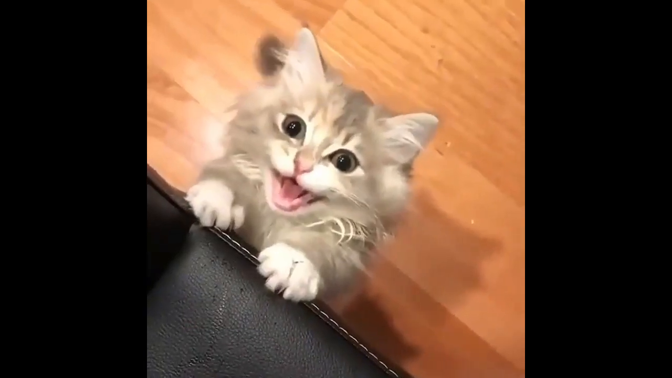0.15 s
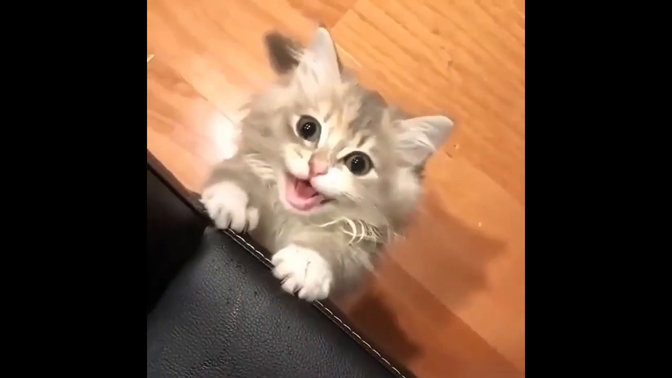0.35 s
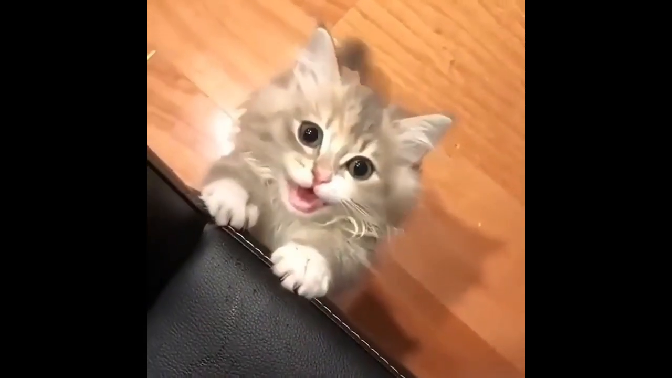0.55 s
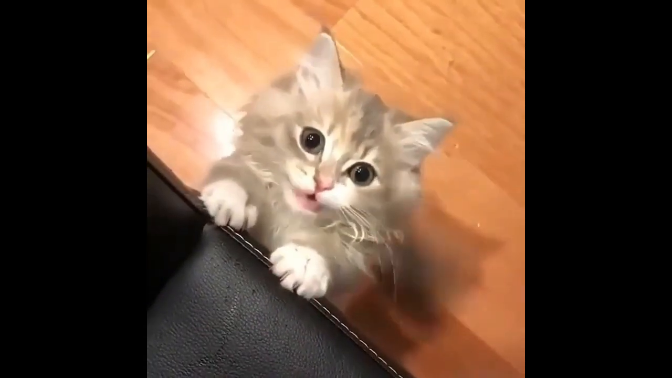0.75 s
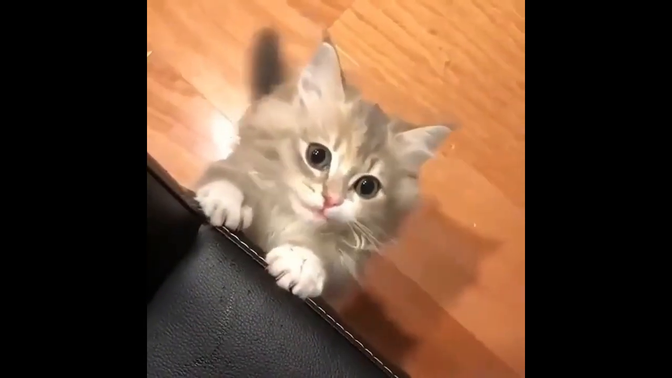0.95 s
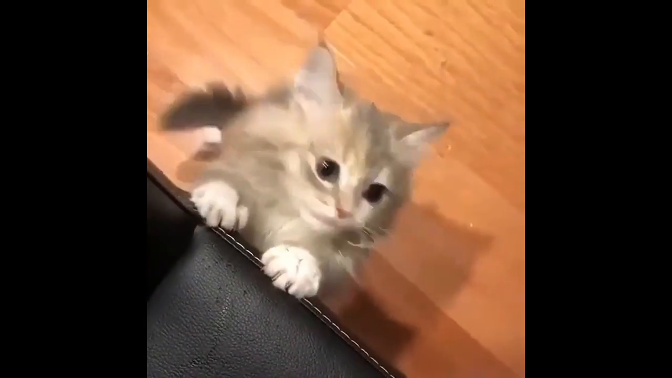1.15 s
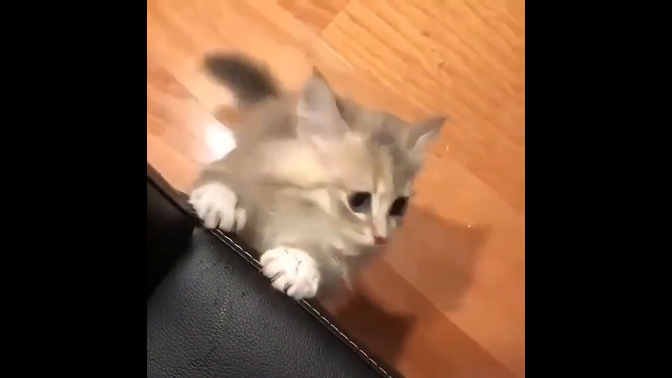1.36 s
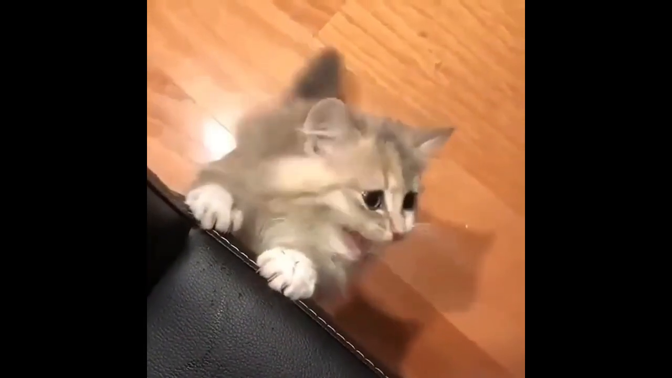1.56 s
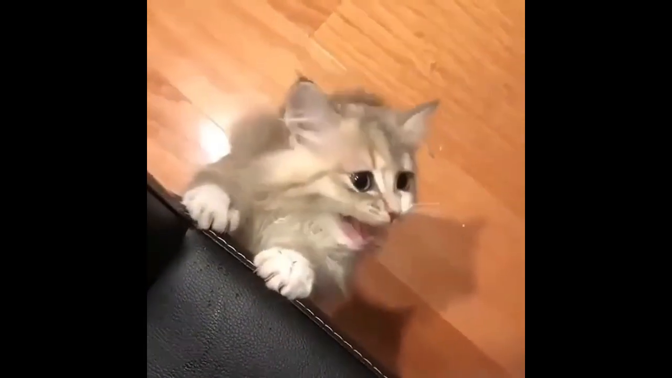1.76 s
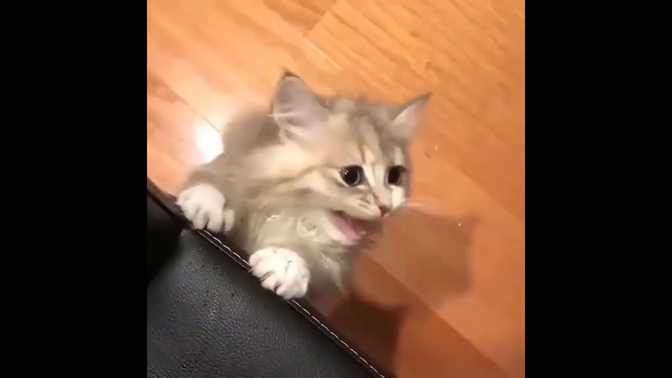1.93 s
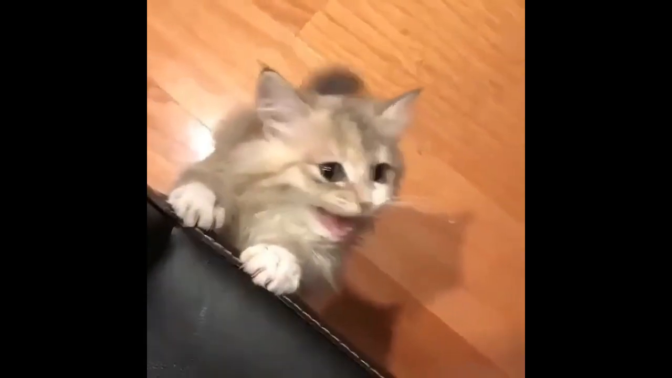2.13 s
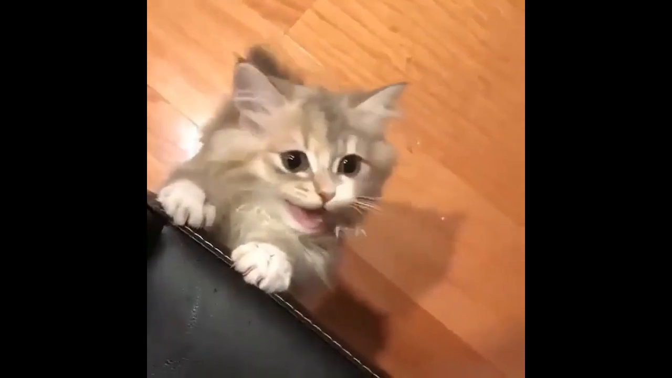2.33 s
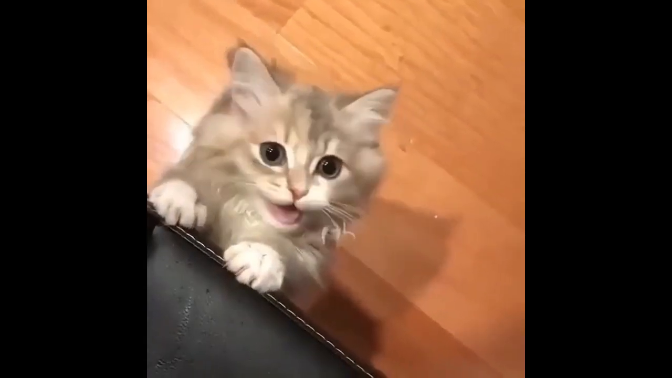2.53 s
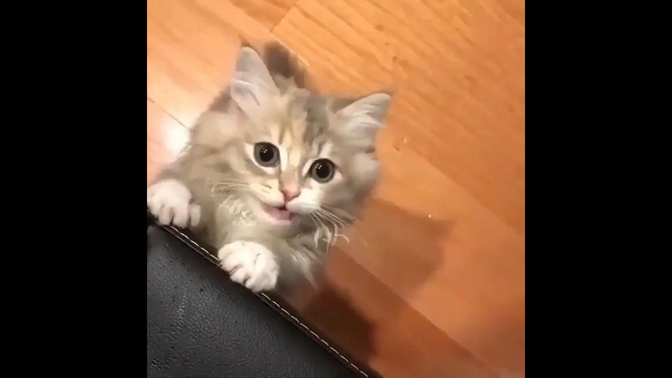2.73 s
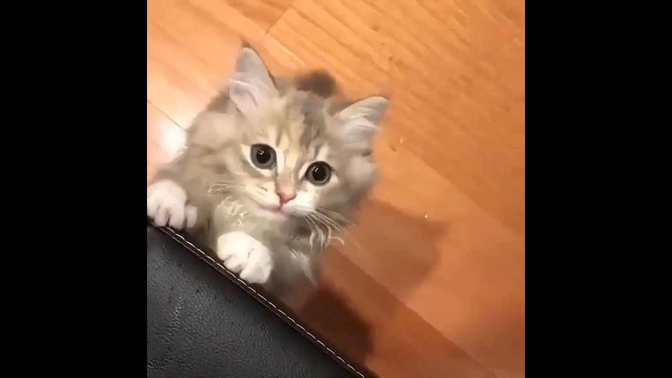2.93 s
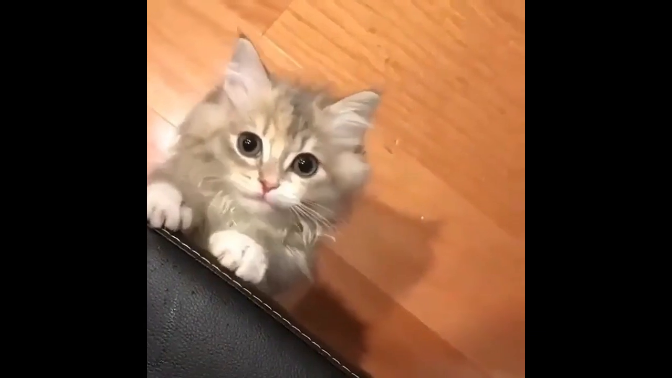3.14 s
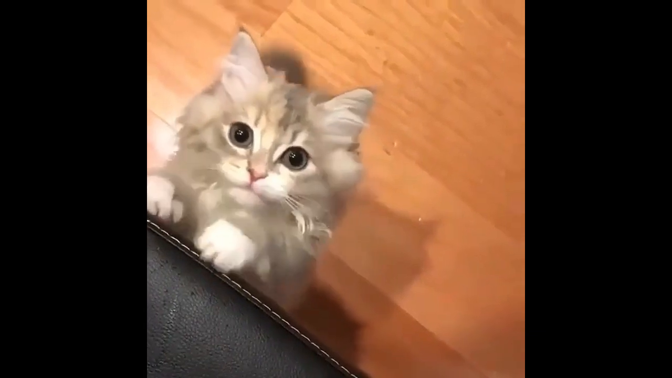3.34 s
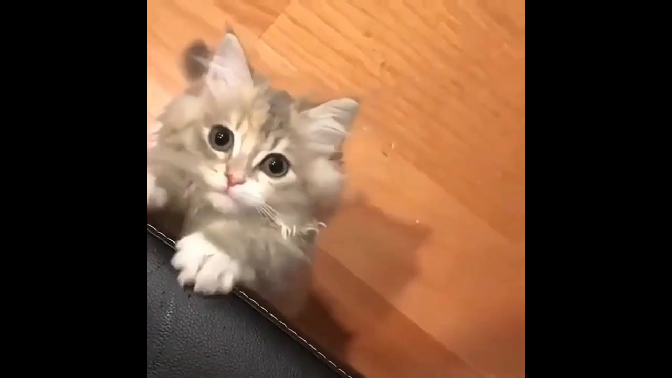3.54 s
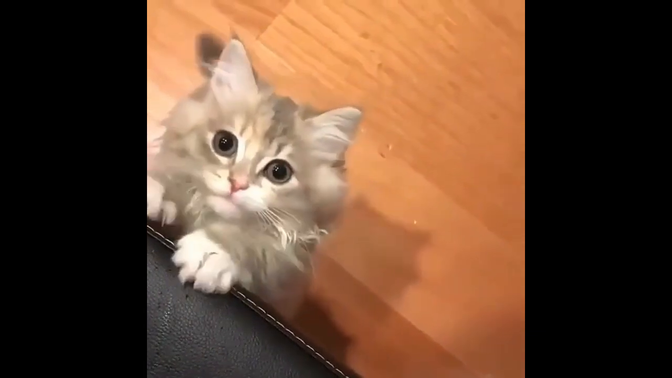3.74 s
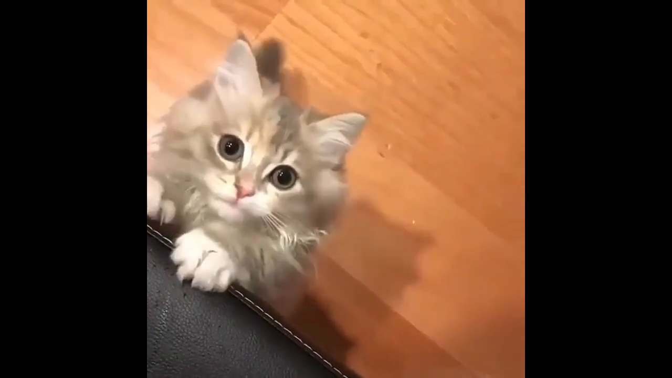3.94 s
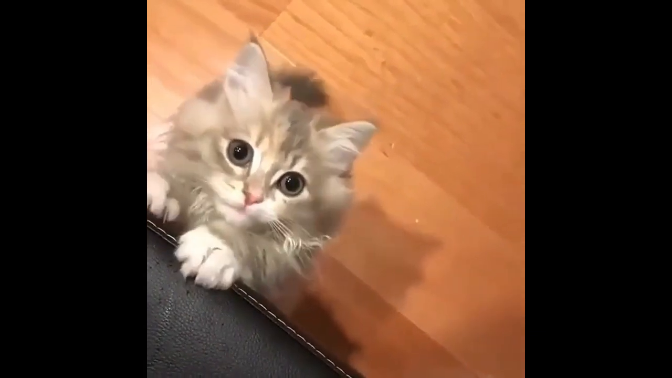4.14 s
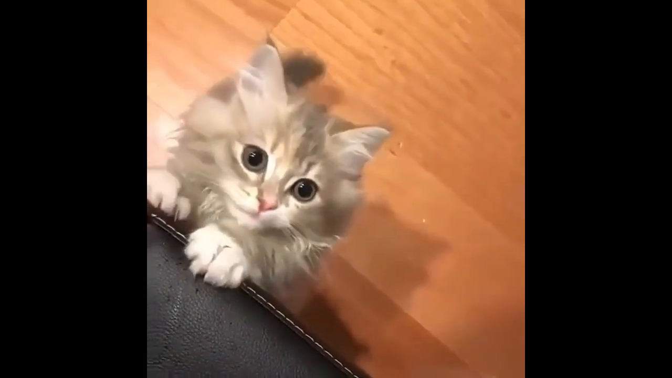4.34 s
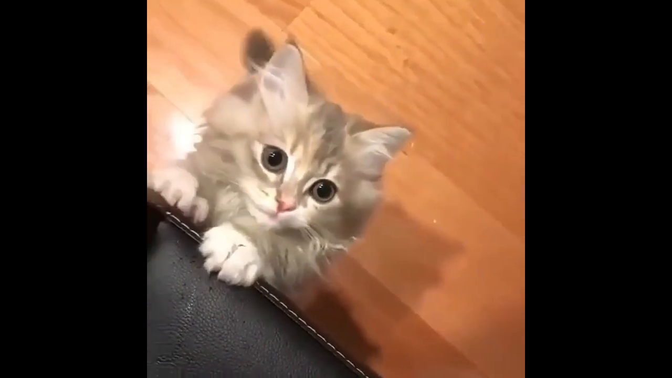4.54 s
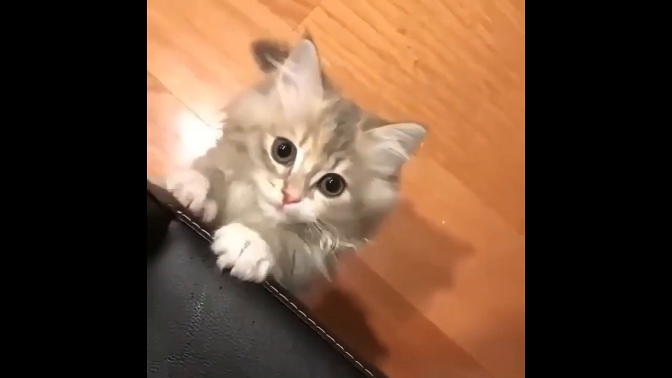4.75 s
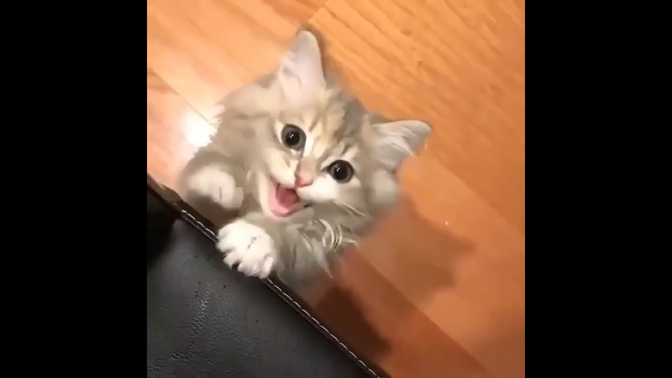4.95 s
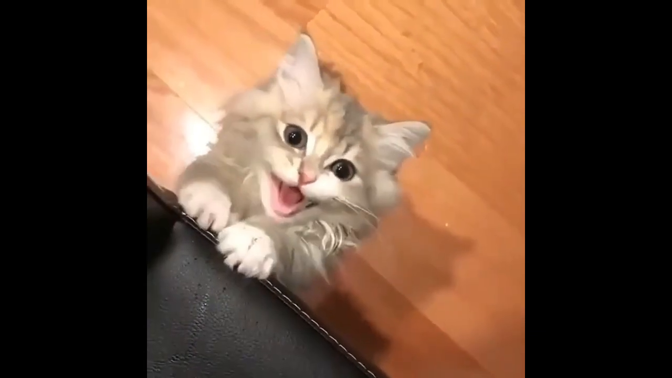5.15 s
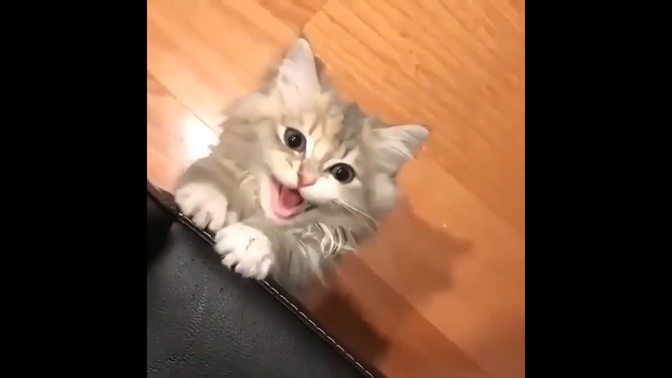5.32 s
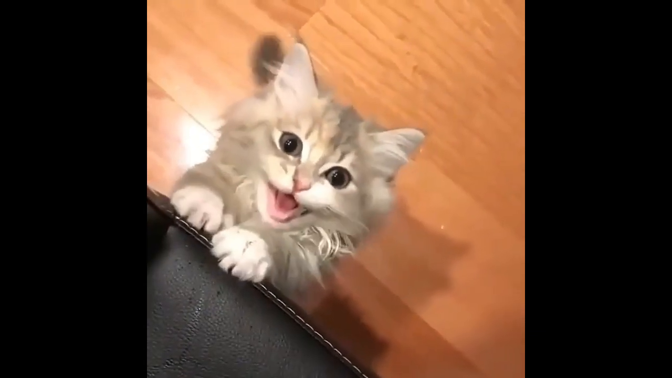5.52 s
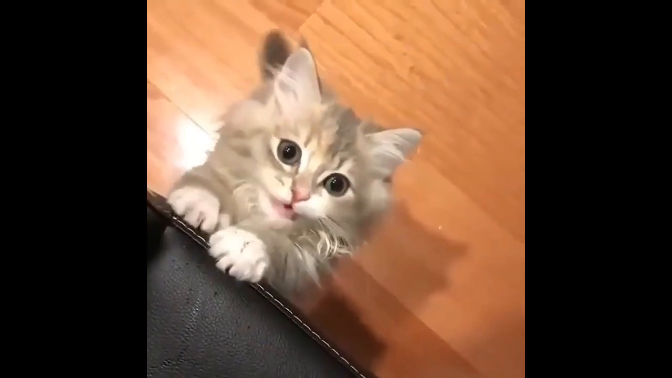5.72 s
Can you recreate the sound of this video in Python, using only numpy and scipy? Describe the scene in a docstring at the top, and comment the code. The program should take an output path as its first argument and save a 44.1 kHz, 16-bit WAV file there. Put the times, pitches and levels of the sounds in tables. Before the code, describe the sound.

A kitten meows twice in a small, quiet room, its high, slightly raspy voice close and nearly dry, dropping at the end of each call. Soft paw thumps, tiny claw ticks and faint rubbing on a leather seat follow. Then comes a third meow, bright at first and hoarse as it falls. A faint household appliance hums underneath.

```python
"""A kitten gives three long, high meows, close up, each sagging in pitch and ending in a creak.
Its vocal folds make a clear harmonic stack, shaped by throat and mouth; turbulent air adds rasp
at the edges of the calls and in hoarse stretches. It stands against a leather seat, where claws tick
and fur slides. Now and then come soft knocks: close, dry taps and roomier pats on the seat.
Underneath, a small room with dull air and a quiet appliance hum."""
import sys
import numpy as np
from scipy import signal
from scipy.fft import rfft, irfft
from scipy.io import wavfile
from scipy.ndimage import uniform_filter1d

SR = 44100
rng = np.random.default_rng(int(sys.argv[2]) if len(sys.argv) > 2 else 0)


def bounce(signal):
    """Save signal as a 16-bit WAV file at the path given by the first command-line argument."""
    frames = np.transpose(np.atleast_2d(signal))
    limited = np.clip(frames, -1, 1)
    pcm = np.round(limited * 32767).astype(np.int16)
    wavfile.write(sys.argv[1], SR, pcm)


N = 259308
TIME = np.arange(N) / SR

# the calls, the first already under way:
# start t/s, voice break t/s, end t/s, bite length/s, jaw closing/s, mouth resonance drop/Hz, creak/dB
CALLS = [(-.3, 0.775, 0.82, 0.047, 0.28, 150, 2.5), (1.509, 2.771, 2.806, 0.12, 0.58, 990, 0),
         (4.927, 5.769, 5.786, 0.19, 0.16, 1190, -3)]
# pitch curve of each call: t/s, f/Hz
PITCH_CURVES = [
    [(0.0, 808), (0.014, 800), (0.144, 781.4), (0.16, 791.2), (0.432, 760.7), (0.504, 742), (0.618, 675.6),
     (0.7, 699), (0.744, 688.6), (0.775, 657.4)],
    [(1.512, 697), (1.542, 786), (1.798, 764.2), (1.896, 783), (2.116, 793.6), (2.162, 776.4),
     (2.41, 770.7), (2.522, 743.3), (2.62, 680.5), (2.708, 670.3), (2.746, 642), (2.768, 602)],
    [(4.934, 730), (4.952, 794), (4.966, 816), (5.066, 734), (5.092, 726.5), (5.164, 754.5), (5.212, 756.7),
     (5.35, 789), (5.622, 773), (5.696, 740.5), (5.738, 675), (5.766, 605)],
]
# loudness curve of the mouth's ring in each call: t/s, level/dB
LOUDNESS_CURVES = [
    [(0.0, -34.5), (0.012, -35), (0.342, -41), (0.402, -38), (0.52, -41.5), (0.544, -35), (0.612, -48),
     (0.692, -37), (0.74, -39.5), (0.775, -51.5)],
    [(1.516, -51.5), (1.588, -49), (1.794, -36), (2.126, -39), (2.182, -47), (2.272, -43), (2.352, -48.5),
     (2.52, -45), (2.628, -61), (2.765, -57)],
    [(4.934, -36.5), (4.966, -42), (4.974, -40), (5.03, -37), (5.096, -45), (5.19, -32), (5.258, -30),
     (5.32, -34.5), (5.654, -39), (5.766, -50.5)],
]
# hoarse stretches: start t/s, end t/s, hiss against tone/dB, period doubling share
HOARSE_STRETCHES = [(1.62, 1.72, -19.5, .22), (1.72, 1.88, -31, .11), (2.2, 2.76, -29, 0),
                    (4.975, 5.03, -20, .24), (5.03, 5.3, -38, 0), (5.3, 5.76, -21, 0)]
# the kitten looks aside for the second call and turns back: t/s, turn (0-1)
HEAD_CURVE = [(1.0, .15), (1.5, 1), (2.05, 0.88), (2.65, 0.34), (4.9, 0.01)]
# the voice's five registers: first harmonic, last harmonic, hiss low f/Hz, hiss high f/Hz
VOICE_REGISTERS = [(1, 1, 500, 1100), (2, 2, 1100, 1800), (3, 4, 1800, 3300), (5, 7, 3300, 6000),
                   (8, 21, 6000, 14000)]
# each register's mix through a call:
# held level/dB, share of loudness swing, bite/dB, widening/dB, slack folds/dB, creak/dB, head turn/dB
REGISTER_MIX = [(-49.5, -0.0066, 1, -3, -1.5, -6, -3), (-55, -0.17, 5, -11, -6, 1.5, -1),
                (-38, 0.99, 0, 0, 0, -3.5, 0), (-45, 0.24, 11.5, 1, -7.5, 1.5, -2),
                (-50.5, 0.14, 5.5, -2, -7, 1.5, -7)]
# how readily each register turns to hiss: rasp offset/dB
REGISTER_AIR = [-8, 1, 1.5, -3, 12]
# how fast each register speaks: attack/s
REGISTER_ATTACK = [0.01, 0.021, 0.0029, 0.0068, 0.015]
# each register's slow tremor: level spread/dB
REGISTER_TREMOR = [.3, .9, .5, .7, 1.4]
# the throat's EQ on the harmonics: f/Hz, level/dB
THROAT_EQ = [(750, -8), (1550, -13.5), (2300, -13.5), (3100, 0), (3900, -2.5), (4650, -4.5), (5450, -22.5),
             (6200, -21), (7400, -24.5), (8600, -5.5), (9500, -5), (10600, -16.5), (12000, -25),
             (13400, -19)]
# colour of turbulent air in the throat: f/Hz, level/dB
BREATH_COLOUR = [(600, 19), (1900, -35), (2450, -25), (2900, 2), (3500, -11), (4500, 8), (5600, -9),
                 (7300, -17), (8700, 0), (10000, -0.5), (12000, -21), (13500, -11.5)]
# bright peak from the wide gape that opens a call: f/Hz, half width/Hz, level/dB, fade/s
GAPE_PEAK = (5800, 750, 18, 0.13)
# treble that stands out with the head turned: f/Hz, half width/Hz, level/dB
OFF_AXIS_PEAKS = [(4550, 300, 6), (5420, 270, 9.5), (6270, 90, 9.5), (6980, 250, 24), (14100, 340, 5)]
# soft knocks, from close, dry taps to roomier pats on the seat: t/s, level/dB, f/Hz, room send/dB
SOFT_KNOCKS = [(0.389, -45, 756, -10), (2.234, -53, 1300, -4), (2.275, -39, 736, -26),
               (2.961, -46, 353, 0.5), (3.383, -35.5, 371, -2), (3.659, -43.5, 250, -3),
               (3.738, -38.5, 340, -5), (4.771, -44.5, 530, -4.5), (5.014, -39, 770, -15)]
# modes of the padded seat: f/Hz, level/dB, t60/s
SEAT_MODES = [(103.5, -2.5, 0.073), (226, -12, 0.036), (375, -0.5, 0.019), (513, -3.5, 0.025),
              (684, 0, 0.016), (1184, 0, 0.0073)]
# claws catching the leather: t/s, level/dB
CLAW_CATCHES = [(2.966, -44), (3.3843, -32.5), (3.6454, -48), (3.7387, -43)]
# modes of a claw's snap: f/Hz, level/dB, t60/s
SNAP_MODES = [(1460, -5, 0.0037), (3500, -5, 0.002), (6040, -4.5, 0.0015), (12200, 1, 0.0021)]
# fur and paws sliding on the leather: centre t/s, half length/s, level/dB
SLIDES = [(0.766, 0.084, -56.5), (2.479, 0.058, -55), (2.82, 0.036, -56), (3.647, 0.026, -54),
          (4.873, 0.032, -55.5)]
# colour of that rubbing: f/Hz, level/dB
SLIDE_COLOUR = [(60, -4), (170, 6), (400, -1), (900, -9), (2000, -18), (12000, -37.5)]
# colour of the room's air: f/Hz, level/dB
AIR_COLOUR = [(15, -88), (25, -27), (58, -4), (107, 0.5), (132, -10), (168, -3), (237, -10), (352, -9.5),
              (459, -19), (497, -15.5), (758, -16.5), (988, -16), (2430, -26.5), (2770, -30.5),
              (13900, -44.5)]
# tones of a household appliance: f/Hz, level/dB
HUM_TONES = [(96.9, -75.5), (166.9, -62.5), (360.7, -69.5)]

BREAK_S = .004   # how fast the folds lose their rhythm


def meow(pitches, loudness, start, breaks, end, bite_s, closing_s, sink_hz, creak_db):
    """The vocal folds sound a harmonic stack in five registers; rasp trades its tone for hiss."""
    inside = (TIME >= start) & (TIME < end)
    t = TIME[inside]
    age_s = t - start
    creak = step((t - breaks) / BREAK_S)
    pitch, loud_db, turned = curve(pitches, t), curve(loudness, t), curve(HEAD_CURVE, t)
    levels_db = register_levels(loud_db, pitch, age_s, bite_s, creak, turned)
    jaw_closed = np.clip(1 + (t - breaks) / closing_s, 0, 1)
    mouth_hz = 2947 - sink_hz * jaw_closed
    rasp, doubling = roughness(t, age_s, creak)
    jitter = .038 * np.tanh(rasp)
    wobble = 1 + jitter * drift(220, len(t)) + .003 * drift(25, len(t))
    phase = 2 * np.pi * np.cumsum(pitch * wobble) / SR
    air = breath(phase, doubling)
    voice = 0
    registers = zip(VOICE_REGISTERS, levels_db, REGISTER_AIR, REGISTER_ATTACK, REGISTER_TREMOR)
    for (first, last, *band_hz), level_db, airy_db, attack_s, tremor_db in registers:
        harmonics = np.arange(first, last + 1)[:, None]
        tone = fold_tone(harmonics, phase, throat(harmonics * pitch, mouth_hz, turned, age_s))
        hiss = unit_rms(filtered(air, band_hz, "band", order=4))
        hiss_ratio = rasp * from_db(airy_db)
        envelope = from_db(level_db + tremor_db * drift(22, len(t))) * np.tanh(age_s / attack_s)
        voice += envelope * (tone + hiss_ratio * hiss) / np.hypot(1, hiss_ratio)
    voice *= 1 + doubling * np.sin(phase / 2)   # strong and weak cycles alternate
    voice *= 1 + .37 * np.tanh(80 * jitter) * drift(72, len(t))   # unsteady folds shake the level
    release = np.clip((end - t) / (end - breaks), 0, 1)
    out = np.zeros(N)
    out[inside] = voice * release * from_db(creak_db * creak)
    return out


def fold_tone(harmonics, phase, gains):
    """One register of the folds' tone; higher harmonics flutter more."""
    gains = gains / np.linalg.norm(gains, axis=0)
    flutter_db = .55 * np.sqrt(harmonics / 4) * np.array([drift(40, len(phase)) for _ in harmonics])
    # the throat delays each harmonic differently, spreading the pulse over its cycle
    partials = np.sin(harmonics * phase + rng.uniform(0, np.pi, harmonics.shape))
    return np.sqrt(2) * np.sum(gains * from_db(flutter_db) * partials, axis=0)


def throat(hz, mouth_hz, turned, age_s, mouth_db=17.5):
    """Gain of the vocal tract: each resonance lifts whichever harmonic it meets."""
    gape_hz, gape_width_hz, gape_db, gape_s = GAPE_PEAK
    mouth = mouth_db * bell(hz, mouth_hz, half_width_hz=480)
    gape = gape_db * np.exp(-age_s / gape_s) * bell(hz, gape_hz, gape_width_hz)
    off_axis = turned * sum(db * bell(hz, centre, width) for centre, width, db in OFF_AXIS_PEAKS)
    return from_db(eq_db(THROAT_EQ, hz) + mouth + gape + off_axis)


def register_levels(loud_db, pitch, age_s, bite_s, creak, turned, slack_hz=723):
    """Register levels in dB: a bright bite, the mouth widens, sagging folds go slack and dull, a creak."""
    swing_db = loud_db + 38   # against a held call
    bite = np.exp(-(age_s / bite_s) ** 2)
    widening = np.exp(-((age_s - bite_s - .077) / .15) ** 2)   # thins the low harmonics after the bite
    slack = step((slack_hz - pitch) / 7.4) * (1 - bite)
    return [held_db + share * swing_db + bite_db * bite + widen_db * widening
            + slack_db * slack + creak_db * creak + turned_db * turned
            for held_db, share, bite_db, widen_db, slack_db, creak_db, turned_db in REGISTER_MIX]


def roughness(t, age_s, creak, clear_db=-29, onset_db=-5, creak_db=5, settle_s=.018):
    """Rasp and period doubling: the folds run rough at the start, in hoarse stretches and letting go."""
    rasp = from_db(clear_db) + from_db(onset_db) * np.exp(-age_s / settle_s) + from_db(creak_db) * creak
    doubling = .25 * creak
    for start, end, hiss_db, share in HOARSE_STRETCHES:
        stretch = step((t - start) / BREAK_S) * step((end - t) / BREAK_S)
        rasp += from_db(hiss_db) * stretch
        doubling += share * stretch
    return rasp, doubling


def breath(phase, doubling):
    """Turbulence pulses as the folds open; it comes in patches, and in bursts when they lose rhythm."""
    patches = from_db((2.5 + 4 * doubling) * drift(60, len(phase)))
    patches /= np.sqrt(uniform_filter1d(patches ** 2, SR // 30))
    pulsing = 1 + .5 * np.cos(phase)
    return noise(BREATH_COLOUR, len(phase)) * pulsing * patches


def soft_knocks(lag_s=.002576):
    """Each knock rings at its own pitch over the seat's modes; returns dry sound and room send."""
    direct, send = np.zeros(N), np.zeros(N)
    click = signal.unit_impulse(SR // 4)
    for s, level_db, knock_hz, send_db in SOFT_KNOCKS:
        seat = sum(from_db(db + .5 + rng.normal(0, 1)) * ring(click, hz, t60)
                   for hz, db, t60 in SEAT_MODES)
        knock = from_db(-2.5) * ring(click, knock_hz, t60=.017)
        softened = filtered(seat + knock, 2.2 * knock_hz, "low")
        thump = from_db(level_db) * filtered(softened, 149, "high")
        at = int((s + lag_s) * SR)   # every thump sounds about 2.6 ms after its listed time
        direct[at:at + len(thump)] += thump
        send[at:at + len(thump)] += from_db(send_db) * thump
    return direct, send


def claws(trim_db=4.5, softest_cutoff_hz=4130):
    """A claw snaps off the leather with a tiny tick; the harder the snap, the brighter."""
    out = np.zeros(N)
    softest_db = min(db for _, db in CLAW_CATCHES)
    click = signal.unit_impulse(SR // 20)
    for s, level_db in CLAW_CATCHES:
        snap = sum((-1) ** i * from_db(db + rng.normal(0, 1)) * ring(click, hz, t60)
                   for i, (hz, db, t60) in enumerate(SNAP_MODES))
        cutoff_hz = softest_cutoff_hz * from_db(.5 * (level_db - softest_db))
        at = int(s * SR)
        out[at:at + len(snap)] += from_db(level_db + trim_db) * filtered(snap, cutoff_hz, "low")
    return out


def scuffs():
    """Fur and paws slide on leather: dull, uneven rubbing that swells and fades."""
    envelope = sum(from_db(db) * np.exp(-((TIME - s) / half_s) ** 2) for s, half_s, db in SLIDES)
    catching = from_db(2.5 * drift(50))
    return envelope * catching * noise(SLIDE_COLOUR)


def room(x, wall_hz, build_s, t60=.27):
    """Diffuse reflections build up and die away, dulled by the walls."""
    t = TIME[:SR // 2]
    build_up = np.clip(t / build_s, 0, 1) ** 2
    tail = rng.standard_normal(len(t)) * from_db(-60 * t / t60) * build_up
    return signal.fftconvolve(x, filtered(tail / np.linalg.norm(tail), wall_hz, "low"))[:N]


def appliance_hum(trim_db=-3.5, waver_db=3.5):
    """An appliance hums on three low tones, each wavering in level and phase."""
    return sum(from_db(db + trim_db + waver_db * drift(9))
               * np.sin(2 * np.pi * hz * TIME + .5 * drift(.72)) for hz, db in HUM_TONES)


def room_air(level_db=-58.5):
    """A steady bed of dull room tone."""
    return from_db(level_db) * noise(AIR_COLOUR)


def from_db(db):
    """Decibels to gain."""
    return 10 ** (np.asarray(db) / 20)


def unit_rms(x):
    """Scale to an rms of 1."""
    return x / np.sqrt(np.mean(x ** 2) + 1e-20)


def curve(points, t):
    """Read an automation curve at times t."""
    return np.interp(t, *np.transpose(points))


def eq_db(points, hz):
    """Read an EQ curve on a log-frequency axis."""
    f, db = np.transpose(points)
    return np.interp(np.log(hz), np.log(f), db)


def bell(hz, centre_hz, half_width_hz):
    """Bell shape of a resonance, 1 at its centre."""
    return 1 / (1 + ((hz - centre_hz) / half_width_hz) ** 2)


def step(x):
    """Smooth rise from 0 to 1 around x = 0."""
    return .5 + .5 * np.tanh(x / 2)


def noise(colour, size=N):
    """Coloured noise, rms 1."""
    hz = np.fft.rfftfreq(size, 1 / SR) + 1e-3
    return unit_rms(irfft(rfft(rng.standard_normal(size)) * from_db(eq_db(colour, hz)), size))


def drift(rate_hz, size=N):
    """Smooth random modulation up to about rate_hz, rms 1."""
    hz = np.fft.rfftfreq(size, 1 / SR)
    return unit_rms(irfft(rfft(rng.standard_normal(size)) / (1 + (hz / rate_hz) ** 2), size))


def filtered(x, hz, kind, order=2):
    """Low-, high- or band-pass."""
    return signal.sosfilt(signal.butter(order, np.minimum(hz, .45 * SR), kind, fs=SR, output="sos"), x)


def ring(click, hz, t60):
    """A unit click sets a decaying sine ringing."""
    decay, angle = from_db(-60 / (t60 * SR)), 2 * np.pi * hz / SR
    return signal.lfilter([0, np.sin(angle)], [1, -2 * decay * np.cos(angle), decay ** 2], click + 1e-18)


def scene():
    """The voice sits close and nearly dry, most knocks further into the room; mono on both channels."""
    voice = sum(meow(pitches, loudness, *call)
                for pitches, loudness, call in zip(PITCH_CURVES, LOUDNESS_CURVES, CALLS))
    knocks, knock_send = soft_knocks()
    ticks = claws()
    voice_room = from_db(-25) * room(voice, wall_hz=7000, build_s=.008)
    foley_room = room(knock_send + from_db(-1.5) * ticks, wall_hz=5000, build_s=.0042)
    mix = voice + voice_room + knocks + ticks + foley_room + scuffs() + appliance_hum() + room_air()
    return np.tile(mix, (2, 1))


def record(dry, cutoff_hz=14000):
    """A steep high cut on the whole mix."""
    return signal.sosfilt(signal.ellip(12, .1, 80, cutoff_hz, fs=SR, output="sos"), dry)


dry = scene()
out = record(dry)
bounce(out)
```